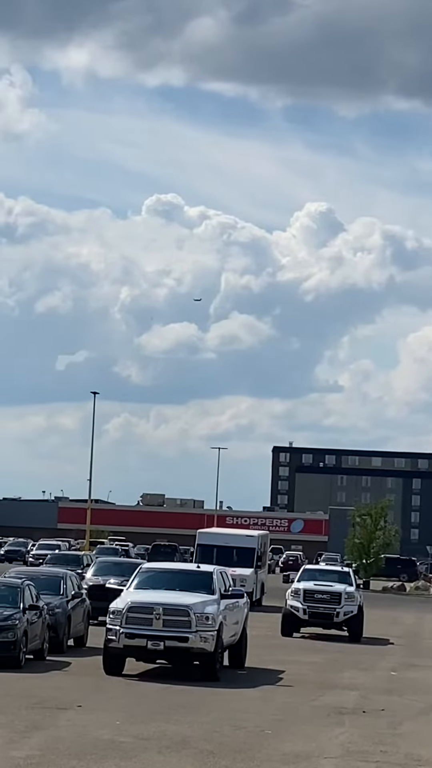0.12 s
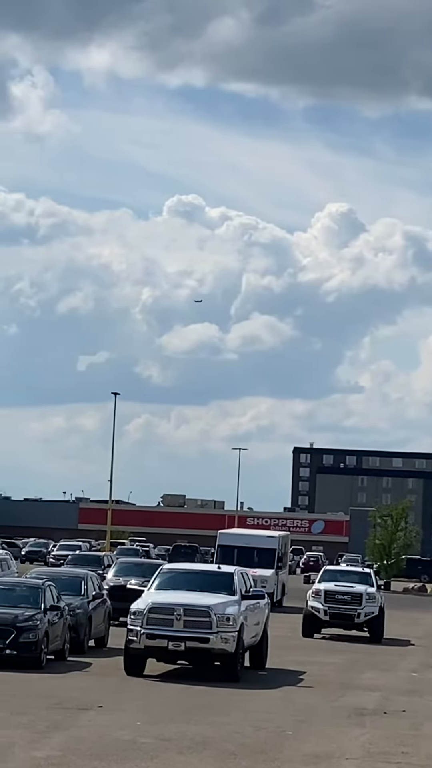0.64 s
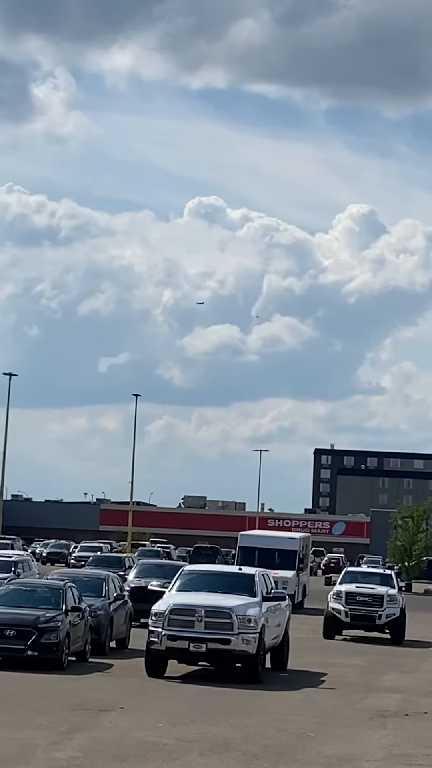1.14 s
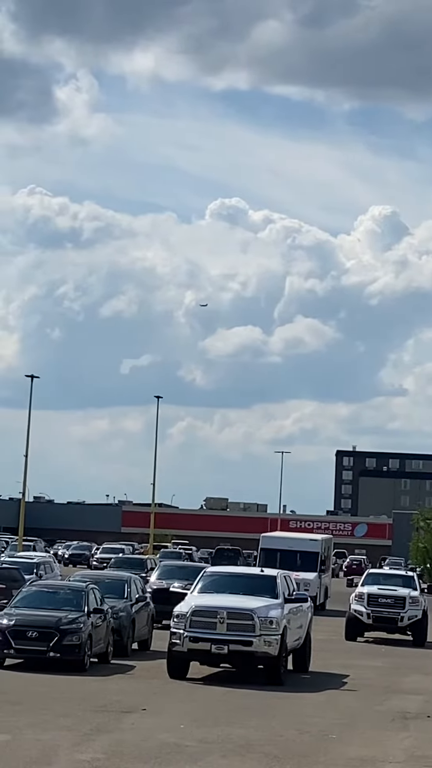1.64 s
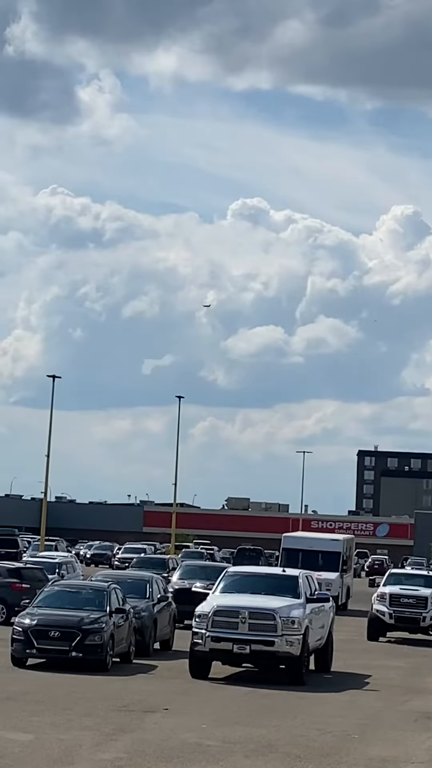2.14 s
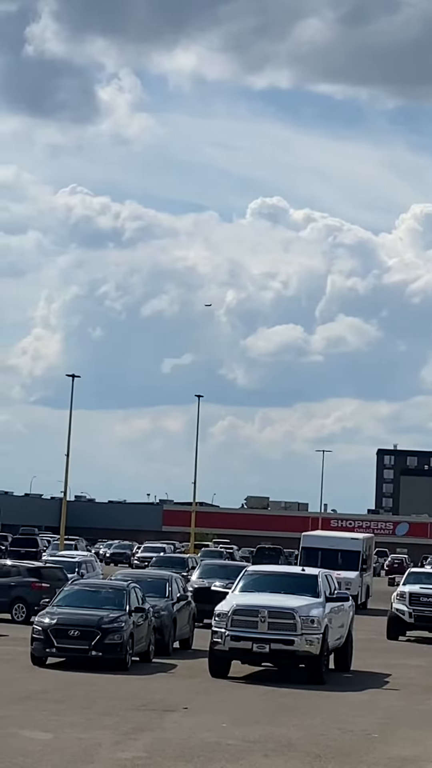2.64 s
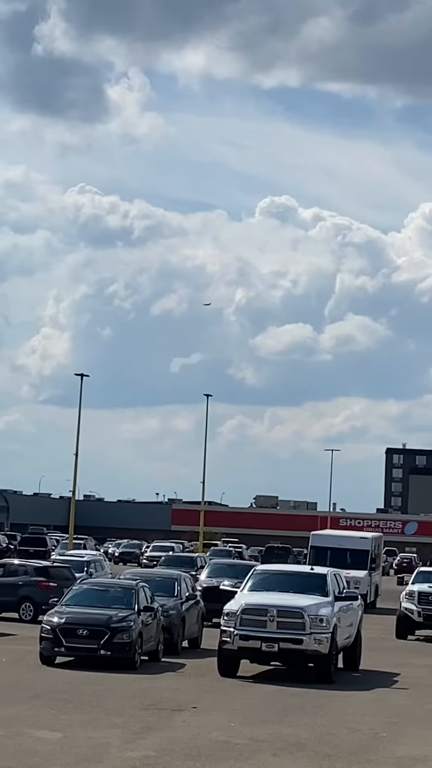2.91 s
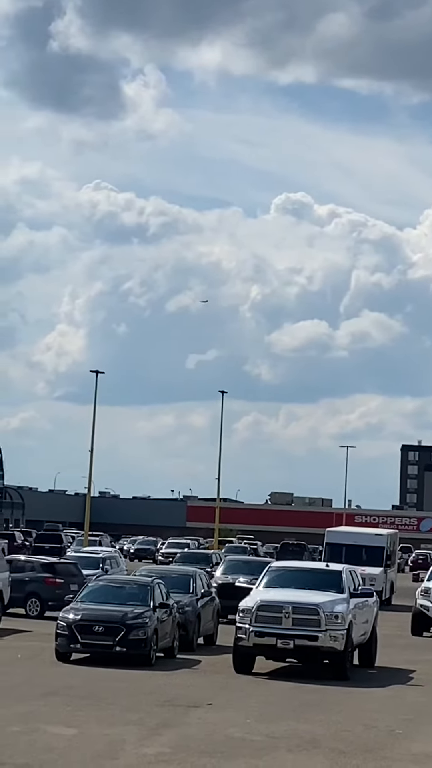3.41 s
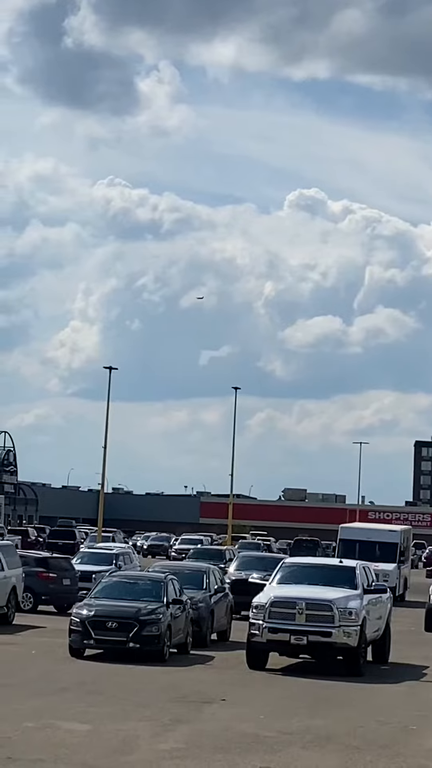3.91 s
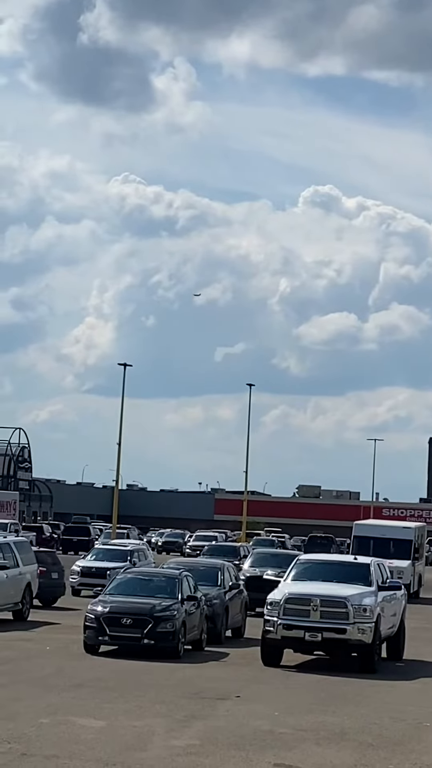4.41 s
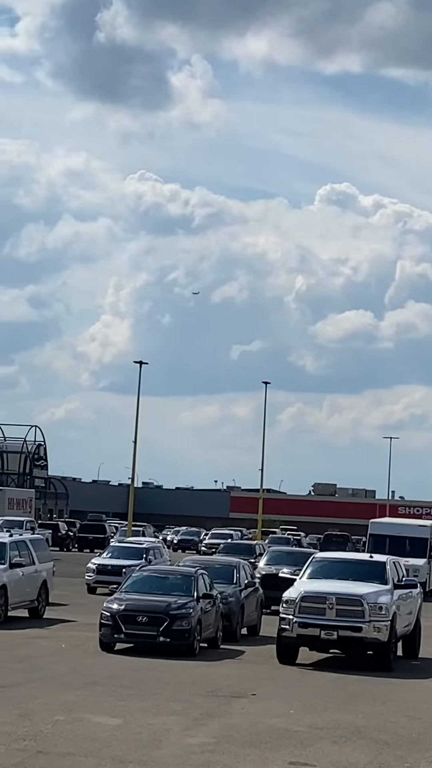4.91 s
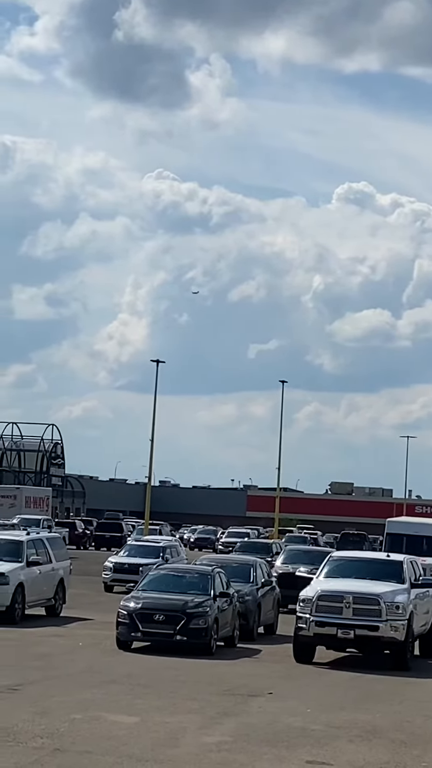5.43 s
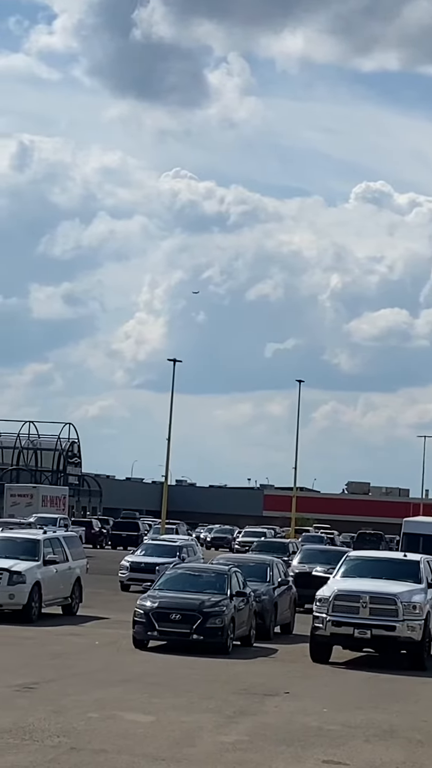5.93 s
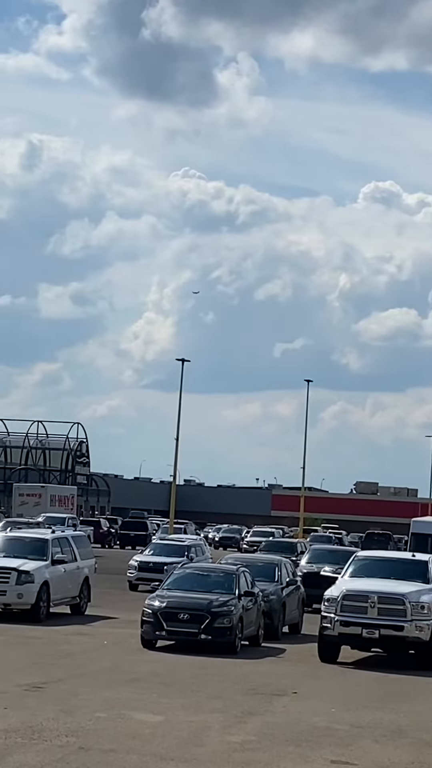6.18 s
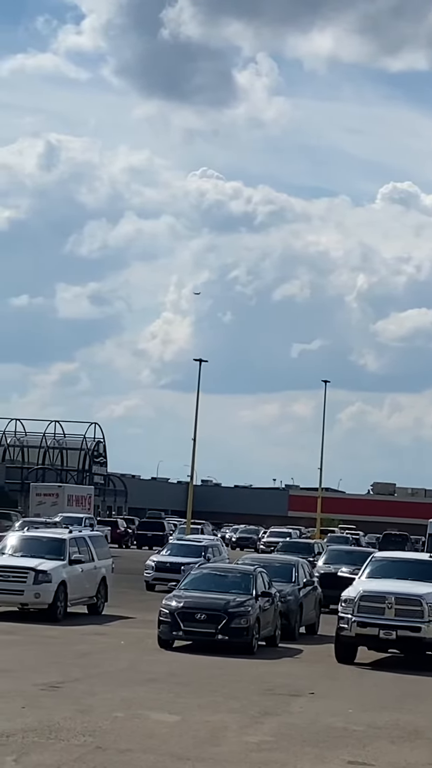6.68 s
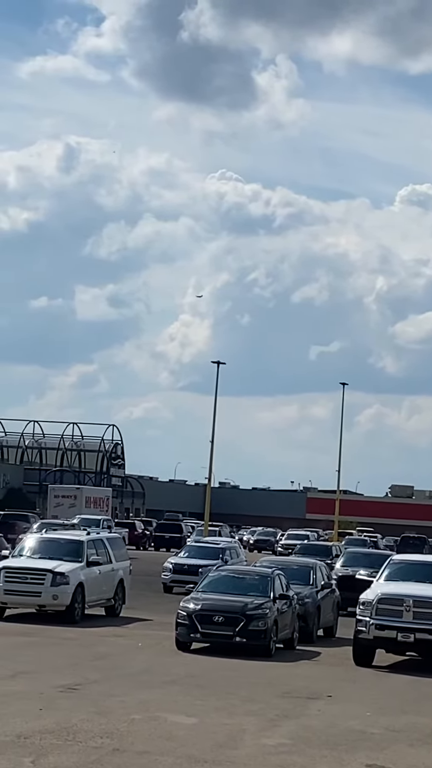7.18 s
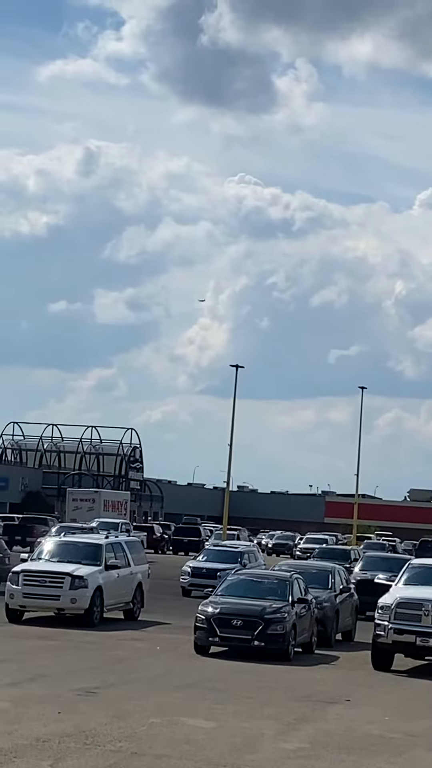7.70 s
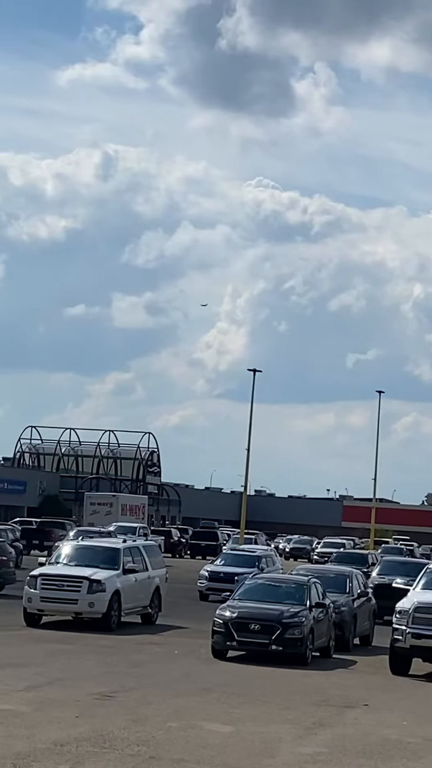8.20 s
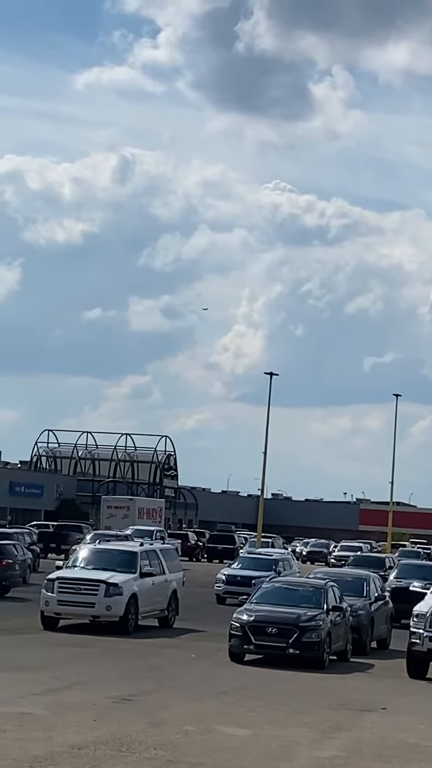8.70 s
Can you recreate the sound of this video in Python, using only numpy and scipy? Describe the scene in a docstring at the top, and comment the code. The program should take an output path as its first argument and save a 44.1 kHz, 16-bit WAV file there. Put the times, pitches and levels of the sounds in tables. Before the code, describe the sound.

A large eight-cylinder diesel ticks over throughout, with quick rattling knocks, a low hum and bright valve ticks, strongest in the first half. Behind it lie a soft traffic wash, wavering motor hums and a distant low aircraft drone. The hand-held phone catches soft wind thumps after two seconds, a small puff near seven and a half, and a violent low gust from nine seconds to the end.

```python
"""A big eight-cylinder diesel idles in an open car park: each firing rattles its parts, with exhaust tones and ticks.
Wind rumbles on the microphone of a hand-held phone as shaped noise with single thumps, and ends in a hard gust.
A small aircraft drones far away and other motors hum, all as wavering sines.
Soft hisses pass as bands of noise, and distant traffic washes as patchy noise."""
import sys
import numpy as np
from scipy import signal
from scipy.io import wavfile
from scipy.ndimage import uniform_filter1d

SR = 44100
rng = np.random.default_rng(int(sys.argv[2]) if len(sys.argv) > 2 else 0)


def transcribe(signal):
    """Save signal, clipped to [-1, 1], as a 16-bit WAV file at the path in sys.argv[1]."""
    frames = np.atleast_2d(signal).T
    limited = np.clip(frames, -1, 1)
    pcm = np.round(limited * 32767).astype(np.int16)
    wavfile.write(sys.argv[1], SR, pcm)


def invert_db(x):
    """Field ratio 10**(x/20) for x, a level in decibels (scalar or array-like)."""
    u = np.asarray(x, float) / 20
    return 10 ** u


N = 422463  # length in samples


def evened(x):
    """Scales to rms 1."""
    return x / np.sqrt(np.mean(x ** 2) + 1e-20)


def steadied(x, span_s):
    """Takes most of the chance swells out of noise, then scales it to rms 1."""
    power = uniform_filter1d(x ** 2, round(span_s * SR))
    return evened(x / np.sqrt(power + 0.11))


def read(points, hz, order=1):
    """Reads one column of a table on a log-frequency axis."""
    table = np.transpose(points)
    return np.interp(np.log(hz + 1), np.log(table[0] + 1), table[order])


def curve(rows, order=1):
    """Reads one column of a curve at every sample."""
    table = np.transpose(rows)
    return np.interp(np.arange(N) / SR, table[0], table[order])


def wander(rate):
    """Slow chance movement of rms 1, up to rate swings a second."""
    t = np.arange(0, N + 256, 256) / SR
    rates = rate * np.geomspace(.05, 1, 20)
    slow = sum(np.sin(2 * np.pi * (f * t + rng.random())) / np.sqrt(f) for f in rates)
    return np.interp(np.arange(N) / SR, t, evened(slow))


def coloured(points, size, patchy_db):
    """Noise of rms 1 from random short-time spectra with drifting patches."""
    hz = np.fft.rfftfreq(size, 1 / SR)
    a, b, patches = rng.standard_normal((4 * N // size + 6, len(hz), 3)).T
    patches = uniform_filter1d(patches, size=8, axis=0)  # smooth over frequency
    patches = evened(uniform_filter1d(patches, size=5, axis=1))  # smooth over time
    spectra = (a + 1j * b) * invert_db(read(points, hz)[:, None] + patchy_db * patches)
    return evened(signal.istft(spectra, nperseg=size, noverlap=size * 3 // 4)[1][:N])


def ring(x, modes_hz, modes):
    """Passes x through steep resonances, each at its own rms level."""
    out = np.zeros(N)
    for hz, (width, db) in zip(modes_hz, modes):
        r = np.exp(-np.pi * width / SR)
        pole = [1, 0, -1, 1, -2 * r * np.cos(2 * np.pi * hz / SR), r * r]
        out += invert_db(db) * evened(signal.sosfilt([pole, pole], x))  # the same resonance twice over
    return out


def puffs(at, size, rise_s):
    """A short soft swell from each sample index, at its peak after rise_s."""
    train = np.zeros(N)
    train[at] = size
    u = np.arange(SR // 20) / (rise_s * SR)
    return signal.oaconvolve(train, (u * np.exp(1 - u)) ** 2)[:N]


def tone(hz, db, waver_hz, waver_db):
    """A sine that wavers in pitch and level on its way through moving air."""
    turns = np.cumsum(hz + waver_hz * wander(3)) / SR + rng.random()
    level = np.sqrt(2) * invert_db(db + waver_db * wander(3.6))
    return level * np.sin(2 * np.pi * turns)


def engine_cycles():
    """Counts engine cycles, five a second; the idle hunts a little."""
    # how far the firings run late: (time [s], delay [ms])
    late = [(0.0, 3.8), (2.25, 9.5), (4.7, 13.5), (6.0, 12.2), (7.9, 6), (9.58, 7.8)]
    return 5 * (np.arange(N) / SR - curve(late) / 1000)


def rattle(cycles):
    """Eight firings a cycle strike noise that rings in the sump, block and valve gear."""
    # relative blow of each cylinder: (sump [dB], block [dB], valves [dB])
    cylinders = [(4, -2, -2), (-16, -4.5, -1), (4, 3, -14), (-3, -0.5, -5), (6, -4.5, -0.5), (7, 3, -2),
                 (1.5, 2, -5), (-4, -1, -1.5)]
    # pitches at which each part rings: frequency [Hz]
    sump_hz = 700, 940, 1450, 1570
    block_hz = 2020, 2130, 2260, 2390, 2880, 3120, 3480
    valve_hz = 3850, 4030, 4785, 5900, 7600, 7950, 11000, 13300
    # ringing of each part, a row a pitch: (resonance width [Hz], level [dB])
    sump_modes = [(140, -67), (200, -44), (120, -54.5), (100, -50.5)]
    block_modes = [(80, -63), (130, -54.5), (77, -53.5), (200, -50), (152, -56), (250, -56), (150, -67.5)]
    valve_modes = [(150, -62), (100, -60.5), (150, -60.5), (1600, -61), (400, -55), (200, -60.5),
                   (2500, -61.5), (800, -80)]
    count = len(cylinders)
    firings = np.floor(count * cycles + 0.33).astype(int)  # the rattle starts just ahead of its peak
    at = np.flatnonzero(np.diff(firings)) + 1
    blow_db = np.array(cylinders)[firings[at] % count]
    blow_db = blow_db + 1.5 * rng.standard_normal((len(at), 3))  # no two blows are quite alike
    sump_blows, block_blows, valve_blows = invert_db(blow_db).T
    noise = rng.standard_normal((3, N))
    out = ring(noise[0] * puffs(at, sump_blows, rise_s=0.0079), sump_hz, sump_modes)
    # block and valves never fall quite silent between firings
    out += ring(noise[1] * (0.24 + puffs(at, block_blows, rise_s=0.0056)), block_hz, block_modes)
    out += ring(noise[2] * (0.48 + puffs(at, valve_blows, rise_s=0.0056)), valve_hz, valve_modes)
    return out


def exhaust(cycles):
    """Steady tones at whole multiples of the engine cycle, wavering in level."""
    # (multiple of the engine cycle, level [dB])
    exhaust_tones = [(8, -52), (12, -36), (24, -44.5), (32, -50), (36, -50), (39, -48), (51, -49.5),
                     (92, -56.5)]
    out = np.zeros(N)
    for multiple, db in exhaust_tones:
        level = np.sqrt(2) * invert_db(db + 2.0 * wander(3.4))
        out += level * np.sin(2 * np.pi * (multiple * cycles + rng.random()))
    return out


def valve_ticks(cycles):
    """Loud single ticks and two loose valves, each ticking once a cycle, sound two high rings."""
    # the loudest ticks: (time [s], peak level before the ring levels [dB])
    loud_ticks = [(0.7007, -40), (0.974, -40), (1.9036, -36), (2.5032, -35), (2.7075, -37), (2.9048, -40),
                  (3.31, -34), (3.708, -38.5), (3.903, -35), (4.107, -37), (4.5062, -38), (4.781, -39),
                  (5.307, -33), (8.9017, -36)]
    # loose valves: (place in the cycle [0-1], peak against the ticking level [dB])
    loose_valves = [(0.47, -1.5), (0.83, -5)]
    # ticking level before the ring levels: (time [s], level [dB])
    ticking = [(0, -48), (1.8, -43), (5.2, -42), (5.6, -50), (7.2, -46), (9.58, -50)]
    # two rings of one valve: frequency [Hz]
    tick_hz = 4785, 7950
    s, peak_db = np.transpose(loud_ticks)
    ticks = puffs(((s - .005) * SR).astype(int), invert_db(peak_db), rise_s=.0075)
    for place, db in loose_valves:
        at = np.flatnonzero(np.diff(np.floor(cycles - place))) + 1
        loose_db = db + curve(ticking)[at] + 4 * rng.standard_normal(len(at))  # spread of 4 dB
        ticks = np.maximum(ticks, puffs(at, invert_db(loose_db), rise_s=.0075))
    out = np.zeros(N)
    for hz, db in zip(tick_hz, (-6, -18)):
        turns = np.cumsum(hz + 50 * wander(80)) / SR  # the pitch shivers by about 50 Hz
        out += invert_db(db) * ticks * np.sin(2 * np.pi * turns)
    return out


def diesel():
    """Rattle, exhaust tones and valve ticks all keep time with one engine cycle."""
    cycles = engine_cycles()
    return rattle(cycles) + exhaust(cycles) + valve_ticks(cycles)


def wind_rumble(level_db, breeze_db, gust_db):
    """Low noise that brightens between two wind levels and comes in lumps when light."""
    # noise colours, relative: (frequency [Hz], level [dB per Hz])
    breeze_colour = [(25, -29), (40, 1), (54, 0.5), (108, 0.5), (200, -13.5), (300, -22), (600, -54),
                     (1000, -120)]
    gust_colour = [(25, -27), (45, -4), (65, 1), (134, 4), (250, -0.5), (350, -14), (600, -58),
                   (1000, -120)]
    hard = np.clip((level_db - breeze_db) / (gust_db - breeze_db), 0, 1)
    soft_part = coloured(breeze_colour, size=2048, patchy_db=1.5)
    hard_part = coloured(gust_colour, size=1024, patchy_db=3.5)
    lumpy = invert_db(level_db + (1 - hard) * 2.5 * wander(11))
    return lumpy * steadied(np.sqrt(1 - hard) * soft_part + np.sqrt(hard) * hard_part, span_s=0.08)


def thumps():
    """Single eddies push the microphone ports: short swings, each with a harder snap on top."""
    # (time of the peak [s], peak level without the snap [dB], frequency [Hz], half length [cycles])
    buffets = [(2.072, -17.5, 113, 0.82), (2.145, -16, 94, 0.77), (2.243, -16.5, 95, 0.35),
               (2.328, -21.5, 173, 1.15), (2.68, -21, 100, 1.5), (2.77, -19, 102, 1.8),
               (2.815, -17, 65, 1.4), (6.75, -22.5, 68, 1.3), (9.072, -5.5, 140, 0.54),
               (9.093, -11, 91, 1.5), (9.147, -9, 287, 1.26), (9.178, -9, 430, 2.6),
               (9.278, -0.5, 210, 0.49), (9.299, -10, 120, 0.9), (9.316, -14, 95, 0.7),
               (9.335, -12, 210, 1.4), (9.371, -7, 250, 0.78), (9.385, -8, 130, 0.93),
               (9.43, -9, 130, 0.93), (9.476, -11, 200, 0.67), (9.573, -7, 111, 0.67)]
    snap_hz, snap_db, snap_cycles = 670, -19, 1.1
    t, out = np.arange(N) / SR, np.zeros(N)
    for s, peak_db, hz, cycles in buffets:
        near = slice(round(s * SR) - SR // 20, round(s * SR) + SR // 20)
        u = (t[near] - s) * hz  # time in cycles of the thump
        v = (t[near] - s) * snap_hz  # time in cycles of the snap
        thump = np.exp(-(u / cycles) ** 2) * np.cos(2 * np.pi * u)
        snap = np.exp(-(v / snap_cycles) ** 2) * np.cos(2 * np.pi * v)
        # the snap grows by 2 dB for each dB of the thump
        out[near] += invert_db(peak_db) * (thump + invert_db(snap_db + peak_db) * snap)
    return out


def wind_roar(level_db, gust_db):
    """Higher noise that grows faster than the wind level, so that it stands out in the gust."""
    # noise colour, relative: (frequency [Hz], level [dB per Hz])
    roar_colour = [(200, -32), (300, 7), (440, -7), (520, -13), (750, -16), (1000, -25), (1400, -54),
                   (2000, -120)]
    roar_db = -23.5 + 2.46 * (level_db - gust_db)
    return invert_db(roar_db) * steadied(coloured(roar_colour, size=256, patchy_db=4.5), span_s=0.047)


def wind():
    """One wind strength drives the rumble and the roar; single thumps are added."""
    # strength of the wind at the microphone: (time [s], level [dB])
    strength = [(0, -37.5), (1.72, -34.5), (1.8, -29), (1.92, -38), (2.14, -23.5), (2.3, -28), (2.5, -32),
                (2.59, -42), (2.68, -27.5), (2.81, -32), (2.93, -30), (3.5, -36.5), (6.3, -37), (7.45, -34),
                (7.6, -27), (7.75, -34.5), (8.88, -32.5), (9.03, -22), (9.084, -18.5), (9.138, -21),
                (9.18, -13.5), (9.234, -21), (9.29, -14.5), (9.39, -16), (9.508, -21.5), (9.58, -21)]
    level_db = uniform_filter1d(curve(strength), size=400)
    breeze_db, gust_db = -22.5, -15  # wind levels between which the rumble brightens
    return wind_rumble(level_db, breeze_db, gust_db) + thumps() + wind_roar(level_db, gust_db)


def aircraft():
    """The propeller far off: only its lowest tone clears the wash."""
    # (time [s], level [dB])
    drone_level = [(0, -36.5), (1.5, -36.5), (3, -36.5), (4.5, -33), (6, -35.5), (7.5, -35.5), (9.58, -39)]
    return tone(125.7, curve(drone_level), waver_hz=0.16, waver_db=2.04)


def motors():
    """Hums of other motors, each a wavering sine that fades in and out."""
    # pitches of the hums: frequency [Hz]
    hum_hz = 73.5, 101.5, 113.3, 113, 146, 153.5, 156, 223.4, 306.8, 432.7
    # a row a hum: (level [dB], middle of the fade-in [s], middle of the fade-out [s])
    hum_spans = [(-39.5, 1, 7), (-39.5, 2, 4.56), (-46.5, 0, 5.7), (-53.5, 6.5, 8.4), (-37.5, 5, 12),
                 (-48, 2.5, 3), (-39.5, 4.5, 9.2), (-44.5, -0.5, 12), (-43.5, 0.5, 11), (-49, -5, 10.6)]
    t, out = np.arange(N) / SR, np.zeros(N)
    for hz, (db, start, end) in zip(hum_hz, hum_spans):
        fade = np.clip(np.minimum(t - start, end - t) / 0.26 + .5, 0, 1)
        out += fade * tone(hz, db, waver_hz=0.57, waver_db=0.5)
    return out


def rustle():
    """Bands of hiss that rise and fall: two brief ones and a slow airy swell."""
    # (time of the peak [s], rms level at the peak [dB], half length [s], frequency [Hz], resonance width [Hz])
    hisses = [(0.73, -45.5, 0.023, 4630, 700), (0.718, -52, .02, 10000, 4000), (1.16, -52, .6, 2940, 230)]
    t, out = np.arange(N) / SR, np.zeros(N)
    for s, peak_db, half_s, hz, width in hisses:
        hiss = ring(rng.standard_normal(N), [hz], [(width, peak_db)])
        out += np.exp(-((t - s) / half_s) ** 2) * hiss
    return out


def traffic():
    """Distant traffic as patchy noise: two unlike washes that swell together."""
    # noise colour at the left port, relative: (frequency [Hz], level [dB per Hz])
    wash_colour = [(30, -44), (50, -17.5), (130, -8), (220, -11.5), (330, -4.5), (430, -5), (520, -14),
                   (950, -13), (1300, -19.5), (1900, -27), (3400, -30.5), (6700, -41.5), (11000, -44),
                   (15700, -46)]
    swell = invert_db(-30.5 + 0.2 * wander(7))
    return [swell * coloured(wash_colour, size=2048, patchy_db=1.92) for _ in range(2)]


def ports(left, other):
    """The right port hears the same field partly inverted in the middle and a little later in the treble."""
    # bass and middle: (frequency [Hz], right minus left [dB], likeness [-1 to 1])
    port_pair = [(61, -0.5, 0.89), (140, -10, 0.99), (210, -22, -0.24), (336, -12, -0.81), (430, -9, -0.85),
                 (620, -3.5, -0.46), (970, -7, -0.75), (1430, -4.5, -0.061), (1696, -2, -0.33),
                 (2070, 3, 0.69), (3000, -2, 0.94), (3900, -0.5, 1), (4520, 3, 0.58), (5200, 4, 0.99),
                 (6200, 0.5, 1)]
    # how far the right port lags in the treble: (frequency [Hz], lag [half turns])
    treble_lag = [(5200, 0), (7000, 1), (8000, 1), (9800, 2), (11500, 2), (12700, 3), (14200, 3),
                  (15600, 3.8)]
    hz, t, a = signal.stft(left, SR, nperseg=1024, noverlap=768)
    b = signal.stft(other, SR, nperseg=1024, noverlap=768)[2]
    like = np.clip(read(port_pair, hz, order=2), -1, 1)[:, None]
    sway = 1 + 0.026 * evened(uniform_filter1d(rng.standard_normal(len(t)), size=5))  # the lag flickers
    turn = np.pi * np.interp(np.outer(hz, sway), *np.transpose(treble_lag))
    mixed = like * np.exp(-1j * turn) * a + np.sqrt(1 - like ** 2) * b
    right = invert_db(read(port_pair, hz))[:, None] * mixed
    return np.array([left, signal.istft(right, SR, nperseg=1024, noverlap=768)[1][:N]])


def scene():
    """Far sounds pass the port pair; the wind is nearly alike on both sides."""
    wash, other = traffic()
    far = diesel() + aircraft() + motors() + rustle() + wash
    windy = wind()
    eddy = invert_db(-18) * windy * wander(44)  # small eddies differ between the ports
    return ports(far, other) + windy + np.outer([1, -1], eddy)


def top_cut(x):
    """Nothing passes above the cut-off."""
    return signal.sosfilt(signal.butter(12, 17110, fs=SR, output="sos"), x)


def record(dry):
    """The microphone drops the deepest bass, bends softly near overload and is limited in the treble."""
    thin = signal.sosfilt(signal.butter(4, 38, "high", fs=SR, output="sos"), dry)
    bent = np.tanh(thin)
    low_pass = signal.firwin(511, 15700, window=("kaiser", 9), fs=SR)
    finished = signal.oaconvolve(bent, low_pass[None], "same")
    return top_cut(finished)


dry = scene()
out = record(dry)
transcribe(out)
```